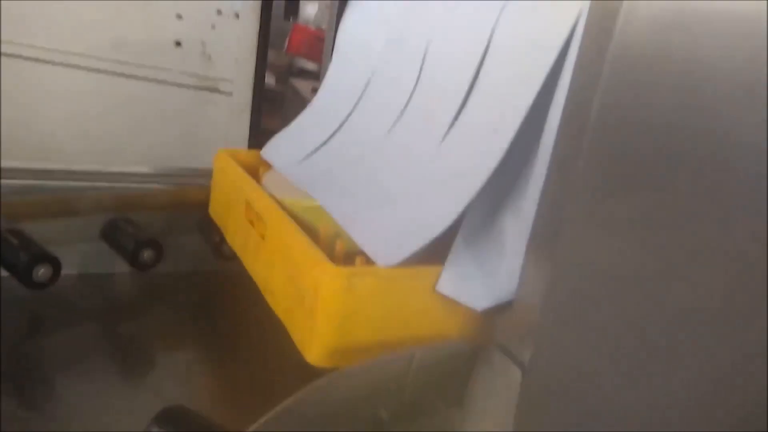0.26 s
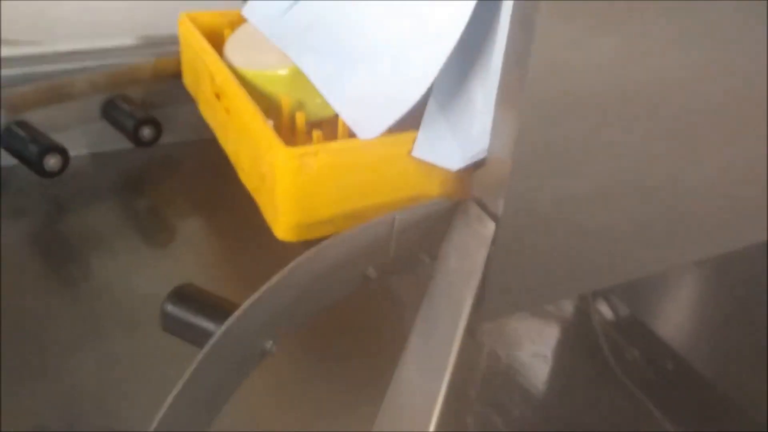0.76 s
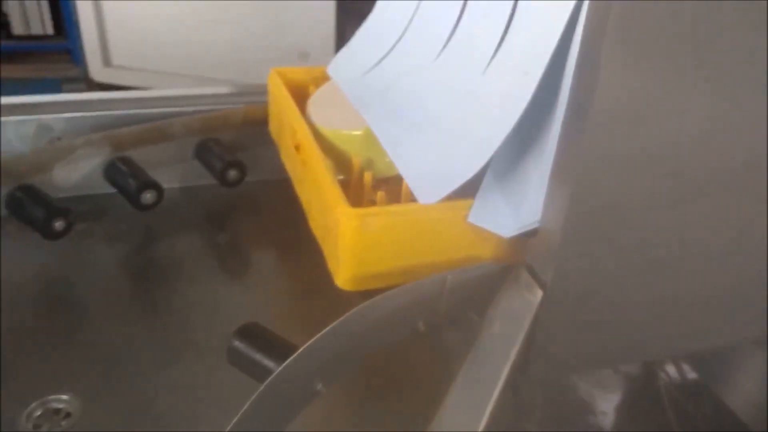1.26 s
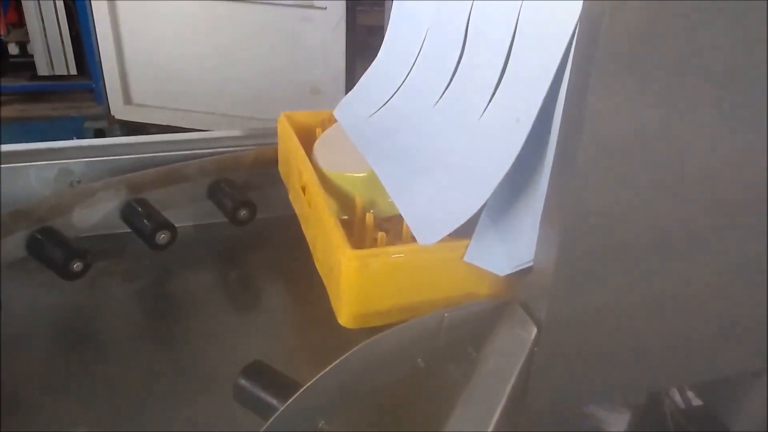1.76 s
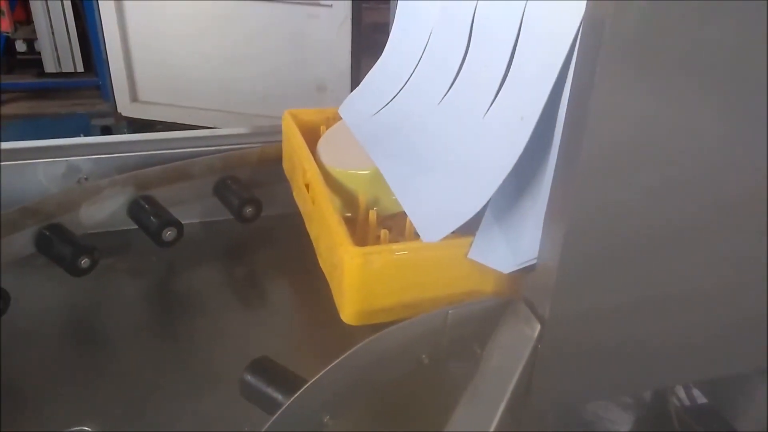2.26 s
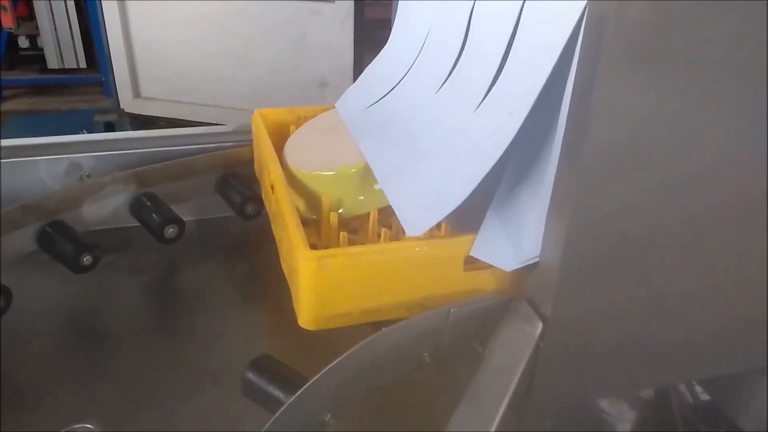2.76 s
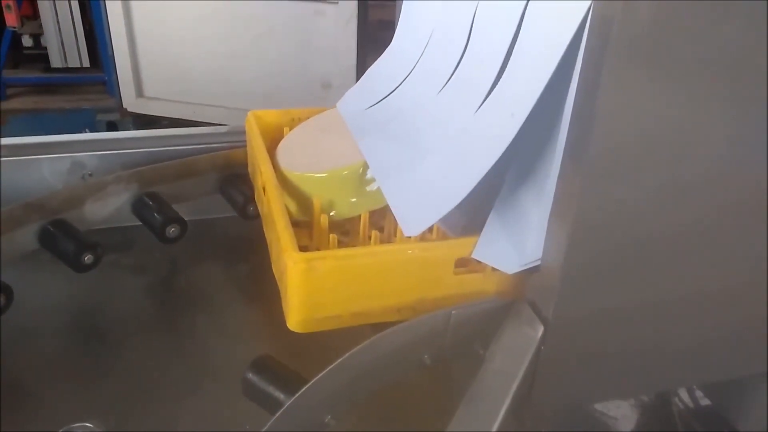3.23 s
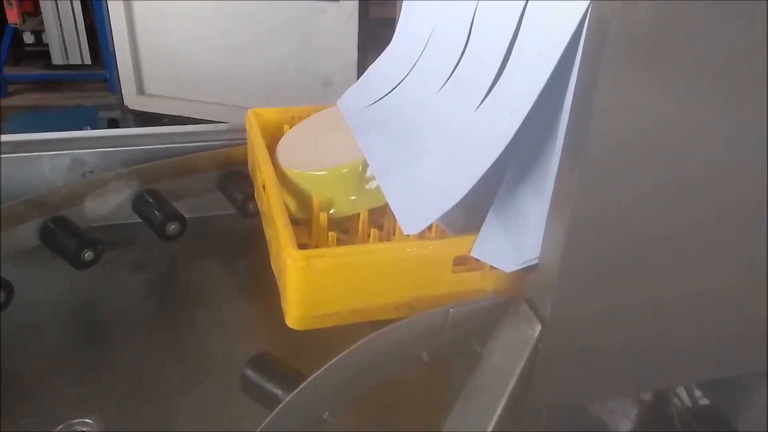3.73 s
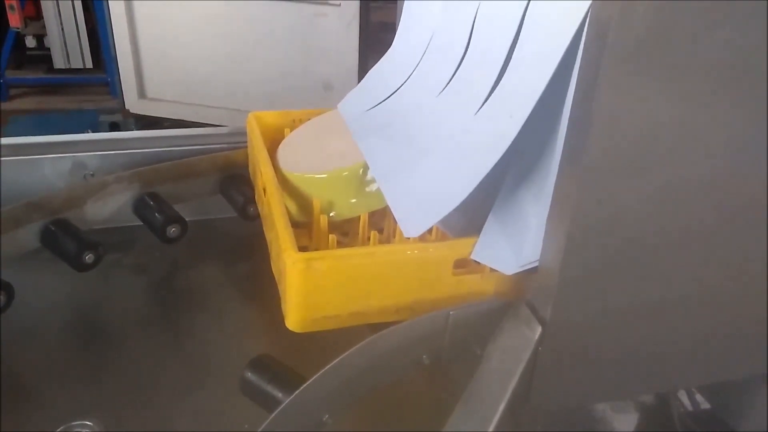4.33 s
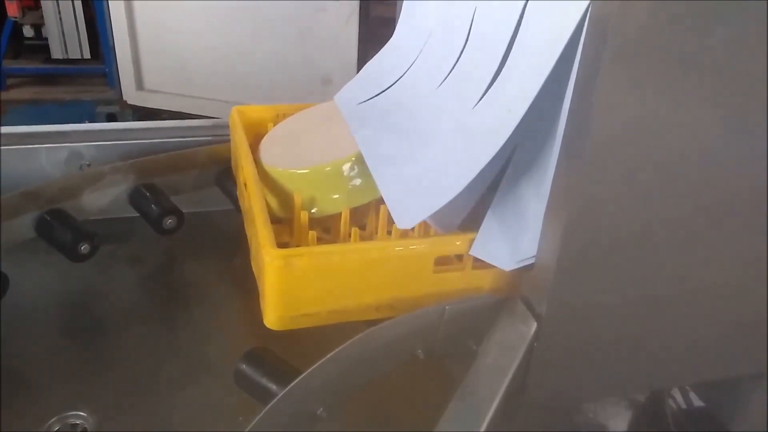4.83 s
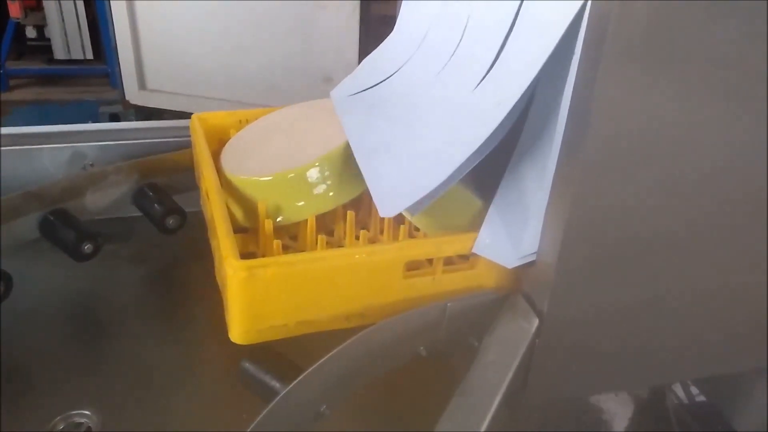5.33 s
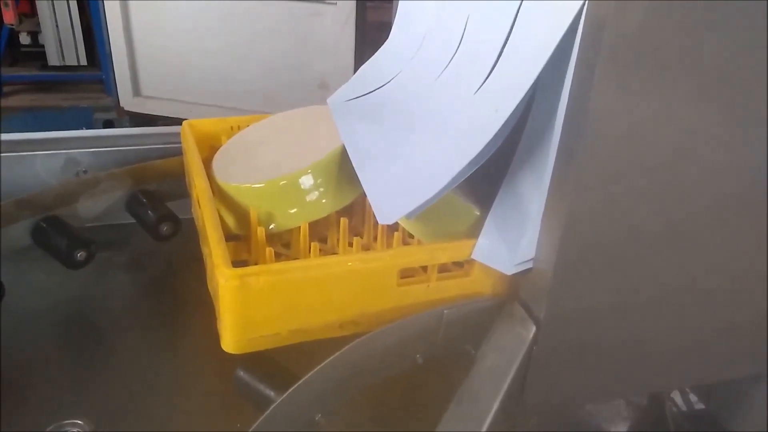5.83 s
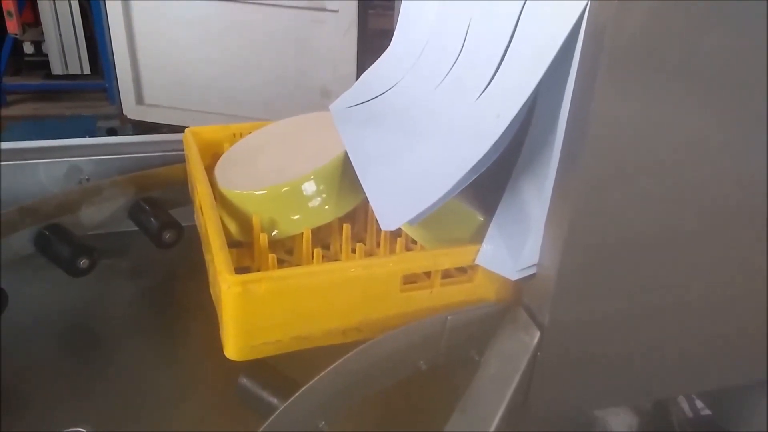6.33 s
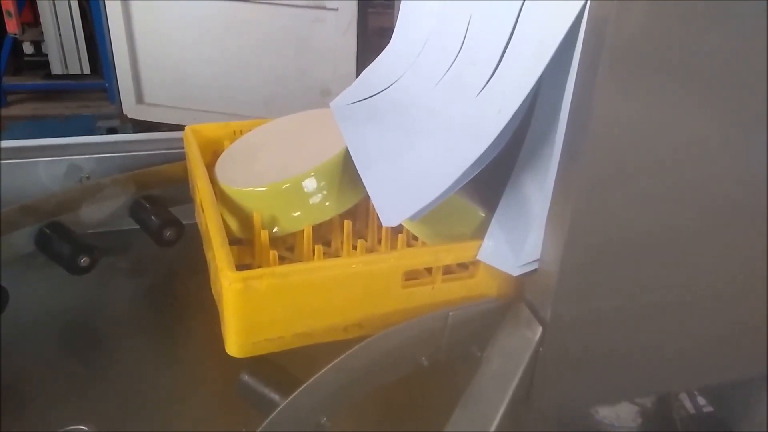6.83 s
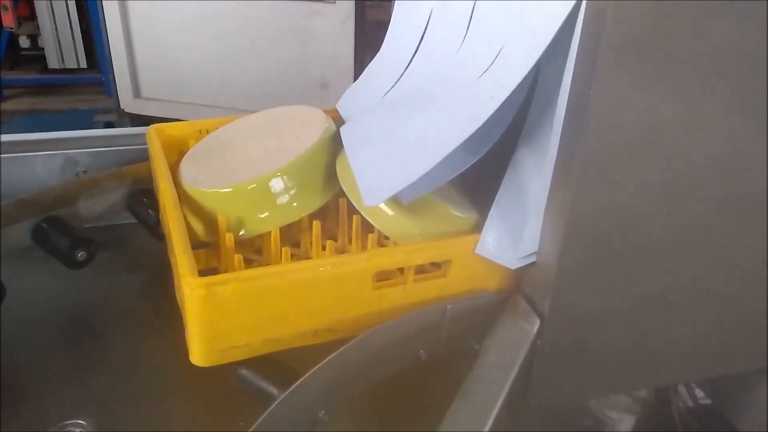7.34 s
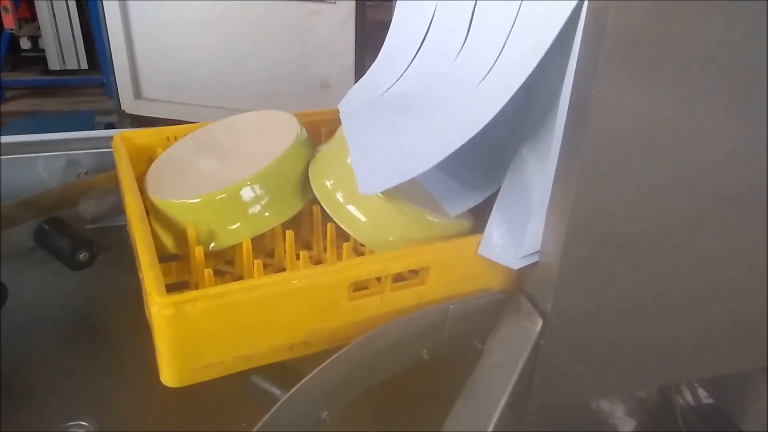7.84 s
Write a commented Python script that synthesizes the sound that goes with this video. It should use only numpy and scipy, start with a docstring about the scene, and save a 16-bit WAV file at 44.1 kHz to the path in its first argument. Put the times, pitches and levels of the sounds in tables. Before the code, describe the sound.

A commercial dishwasher's muffled pumps and hissing spray run throughout, heard close on a phone in stereo with thin bass; noise reduction holds the roar down between blows and lets it surge with them. At 0 s a bowl is knocked, immediately followed by a loud plastic clack. Small chinks and thuds lead to sharp clacks around 0.9 and 1.2 s. At 1.9 s steel pawls clatter hard on a bar, with a heavy low thud at 2.1 and a lighter metallic drop at 2.4. Strong plastic clacks return at 3.2 and 3.6 s, then a steel rattle at 4.2-4.4 and a drop at 4.8. From 4.5 s faint, mid-high crockery chinks scatter, clearer around 5.7 s. Metal clatters again at 6.3 and 6.7 s. Near 7.5 s a low thud meets several bowl chinks; soft knocks and roar continue to about 8 s. Every blow is short, with a clipped kitchen echo.

```python
"""Beside a tunnel dishwasher, a phone with two close microphones hears a plastic dish rack ratcheted out.
Pumps and spray, shaped noise, roar throughout; the phone's noise reduction lets more through with each blow.
A bowl is knocked at once; the rack clacks on rollers and rails, crockery chinks, low thuds come from the steel
table. Near 2 s the steel drive pawls first clatter on their bar, then drop back; from 4.5 s come faint chinks.
Blows are sums of decaying modes, cut short."""
import sys
import numpy as np
from scipy import signal
from scipy.fft import rfft, irfft, next_fast_len
from scipy.io import wavfile
from scipy.ndimage import uniform_filter1d, map_coordinates

SR = 44100
rng = np.random.default_rng(int(sys.argv[2]) if len(sys.argv) > 2 else 0)


def materialize(psi):
    """Save the field psi as 16-bit PCM at rate SR to the path in sys.argv[1].

    A 1-D psi becomes a single channel; in a 2-D psi each row is a channel.
    """
    bounded = np.clip(np.atleast_2d(psi).T, -1, 1)
    quanta = np.round(bounded * 32767).astype(np.int16)
    wavfile.write(sys.argv[1], SR, quanta)


def boost_factor(decibels):
    """Convert a level in decibels to a linear amplitude factor."""
    exponent = np.asarray(decibels, float) / 20
    return 10 ** exponent


N = 356857  # length of the scene, samples
SPAN = SR // 6  # longest a blow may last, samples


def unit(x):
    """Scaled to rms 1."""
    return x / np.sqrt(np.mean(x ** 2) + 1e-20)


def along(f, v, hz):
    """Values v given at f, read at hz on a log frequency axis."""
    return np.interp(np.log(hz + 1), np.log(np.asarray(f) + 1), v)


def filtered(x, response):
    """x times a complex response of frequency."""
    m = next_fast_len(N + SR // 4)
    return irfft(rfft(x, m) * response(np.fft.rfftfreq(m, 1 / SR)), m)[..., :N]


def wobble(rate, size=N):
    """A smooth random curve, rate knots a second."""
    knots = rng.standard_normal(int(size * rate / SR) + 4)
    return map_coordinates(knots, [np.arange(size) * rate / SR])


def rush(spectrum, patchy_db):
    """Two unrelated noises of rms 1 that share patches of random gain."""
    z = signal.stft(rng.standard_normal((2, N)), nperseg=512)[2]
    field = uniform_filter1d(rng.standard_normal(z.shape[1:]), 4, 0)
    field = uniform_filter1d(field, 4, 1)
    pair = signal.istft(z * boost_factor(patchy_db * unit(field)), nperseg=512)[1][:, :N]
    return unit(filtered(pair, lambda hz: boost_factor(along(*np.transpose(spectrum), hz))))


# Calm roar between blows, before wavering: (time [s], level [dB])
CALM_ROAR = [(0, -48.5), (.2, -48.5), (.5, -55), (.75, -53.5), (1.049, -60.5), (1.499, -57.5), (1.9, -58),
             (2.3, -55.5), (2.6, -54.5), (3.1, -58), (3.35, -57.5), (3.75, -61.5), (3.85, -56), (4.5, -57),
             (5.4, -55.5), (6.15, -57), (6.27, -60.5), (6.5, -54), (7.15, -56.5), (7.23, -61), (7.3, -53),
             (8.09, -56.5)]
# Spectra of the muffled pumps, the spray and the far hiss: (frequency [Hz], relative density [dB per Hz])
PUMP_SPECTRUM = [(30, -27.5), (60, -16), (100, 0.5), (160, -6.5), (300, -2), (600, -4.5), (1000, -10),
                 (1500, -14), (2200, -12.5), (4000, -41)]
SPRAY_SPECTRUM = [(900, -38), (1800, -3), (3200, 3), (5000, -1.5), (8000, -8.5), (12000, -18),
                  (15500, -21.5)]
HISS_SPECTRUM = [(200, -13), (1500, -0.5), (6000, -5), (12000, -1.5), (15500, -10.5)]


def roar(blows):
    """Pumps and spray waver over a far hiss; noise reduction lets them through while a blow rings
    and holds them down beside a loud one."""
    open_db, open_from_db, open_slope = -46.5, -42.5, 0.53  # fully open, blow that opens it, dB per dB below
    hush_db, hush_s = 1.5, 0.089  # the holding down just before and after a loud blow, and its span
    spray_db, spray_follows = -9.5, 0.85  # spray against pumps, share of the pumps' swings
    spray_lift = 0.5  # further spray, dB per dB of a very loud blow

    s, low_db = np.transpose(CALM_ROAR)
    low_db = np.interp(np.arange(N) / SR, s, low_db)
    blow_power = uniform_filter1d(np.mean(blows ** 2, axis=0), size=420)
    blow_db = 10 * np.log10(abs(blow_power) + 1e-12)
    over_db = blow_db - open_from_db
    opened_db = open_db + np.minimum(open_slope * over_db, 0)
    loud = np.clip((opened_db - open_db + 6.5) / 4, 0, 1)
    near = uniform_filter1d(loud, round(hush_s * SR))
    calm_db = low_db - hush_db * np.minimum(3 * near, 1) + 1.02 * wobble(15) + 2.32 * wobble(36)
    pumps_db = np.maximum(calm_db, opened_db)
    flutter_db = 1.3 * wobble(24) + 1.7 * wobble(70)
    spray_level_db = low_db + spray_db + spray_follows * (pumps_db - low_db)
    spray_level_db += spray_lift * np.maximum(over_db, 0) + 0.78 * wobble(25)
    pumps = boost_factor(pumps_db) * rush(PUMP_SPECTRUM, patchy_db=1.26)
    spray = boost_factor(spray_level_db) * rush(SPRAY_SPECTRUM, patchy_db=0.2)
    hiss = boost_factor(-73.5) * rush(HISS_SPECTRUM, patchy_db=0.5)
    return boost_factor(flutter_db) * (pumps + spray) + hiss


def ring(hz, db, t60, attack, scatter_db, rough_hz, dense_db, dense_t60):
    """Two takes of decaying modes, as heard along two paths; between them noise stands for countless weak modes."""
    t = np.arange(SPAN) / SR
    level = db + scatter_db * rng.standard_normal(len(hz))
    # loose contact blurs every line: its phase walks at random, in steps of 15 samples
    walk = np.cumsum(rng.standard_normal((2, len(hz), SPAN // 15)), axis=2).repeat(15, axis=2)
    walk = uniform_filter1d(walk, size=30, axis=2)
    step = np.sqrt(2 * np.pi * abs(rough_hz) * 15 / SR)
    phase = rng.uniform(0, 2 * np.pi, (2, len(hz), 1)) + step * walk
    decay = boost_factor(level[:, None] - 60 * t / t60[:, None])
    modes = decay * np.sin(2 * np.pi * hz[:, None] * t + phase)

    bins = np.fft.rfftfreq(SPAN, 1 / SR)
    outline = np.interp(bins, [hz[0] * .8, *hz, hz[-1] * 1.15], [-120, *db, -120])
    outline -= .5e-3 * bins  # the weak modes thin out upwards
    outline[round(10300 * SPAN / SR):] -= 9  # and sink further behind the strong ones at the top
    dense = irfft(rfft(rng.standard_normal((2, SPAN))) * boost_factor(outline), SPAN)
    dense = boost_factor(dense_db - 60 * t / dense_t60) * dense
    return (modes.sum(1) + dense) * (1 - np.exp(-t / attack)) ** 2


# Kitchen echo: (frequency [Hz], t60 [s])
KITCHEN = [(1000, 0.67), (3000, 0.3), (6000, 0.27), (12000, 0.076)]


def add(out, s, blow, wet_db, sink_db, most, fade):
    """One blow with a fresh kitchen echo; the tail fades quickly, sooner the less the blow tops sink_db."""
    hz, t, z = signal.stft(rng.standard_normal((2, SPAN)), SR, nperseg=256)
    t60 = along(*np.transpose(KITCHEN), hz)[:, None]
    tail = signal.istft(z * boost_factor(-60 * t / t60), SR, nperseg=256)[1]
    echo = signal.fftconvolve(blow, tail / np.linalg.norm(tail[0]), axes=1)[:, :SPAN]
    over_db = 20 * np.log10(abs(blow).max()) - sink_db
    hold = np.clip(0.0021 * over_db, .01, most)  # seconds
    closing = 1 / (1 + np.exp((np.arange(SPAN) / SR - hold) / fade))
    out[:, round(s * SR):][:, :SPAN] += (blow + boost_factor(wet_db) * echo) * closing


def notes(rows, spread, t60, attack, gain_db, rough_hz, hold):
    """Soft single notes, each a close pair of modes; rows are (time [s], level [dB], frequency [Hz])."""
    out = np.zeros((2, N + SR))
    for s, db, hz in rows:
        pair = hz * np.array([1 - spread, 1 + spread])
        pair_db = db + gain_db - np.array([0, 7])
        blow = ring(pair, pair_db, np.full(2, t60), attack, scatter_db=2.4, rough_hz=rough_hz,
                    dense_db=-4.0, dense_t60=t60)
        add(out, s, blow, wet_db=-14, sink_db=-76, most=hold, fade=0.036)
    return out[:, :N]


def chink(rows):
    """Struck crockery: a narrow pair of modes with a soft onset."""
    return notes(rows, spread=0.0051, t60=0.14, attack=0.0033, gain_db=6.5, rough_hz=18, hold=0.062)


# Notes of the bowl: (frequency [Hz], level before the crockery gain [dB])
BOWL_NOTES = [(595, -36), (900, -37), (1900, -39.5), (2955, -36), (4150, -35), (6300, -43), (8600, -43.5)]


def bowl():
    """A bowl is knocked once, sounding all its notes together."""
    return chink([(0.0066, db, hz) for hz, db in BOWL_NOTES])


# Hard plastic on rollers and rails: (time [s], level of the modes at 2.2-3.3 kHz before gain [dB],
# then against it: modes below 2.2 kHz [dB], from 3.3 kHz to the edge [dB], above the edge [dB]; edge [Hz])
RACK_CLACKS = [(0.0557, -20.5, -18.5, -2, 2.5, 4100), (0.3881, -51.5, -13, 7, 21, 4100),
               (0.858, -41, -19, 4, 0.5, 4100), (0.8862, -27, -26, -0.5, -13.5, 4100),
               (1.1836, -20, -15.5, -6.5, -42, 3700), (1.209, -26, -20, -6, -27, 3700),
               (1.22, -38.5, -1.5, 1, -25, 3700), (1.539, -42.5, -22, -15, -18, 4100),
               (3.2099, -21.5, -33, 1, -5.5, 4500), (3.429, -38, -13.5, -22, -15, 4100),
               (3.459, -42.5, -16, -9, -12, 4100), (3.6194, -18, -17.5, -6.5, -38, 4500),
               (3.6387, -33, -24, -19, -34, 4500)]
# Modes of the rack: (frequency [Hz], relative level [dB], t60 [s])
RACK_MODES = [(1674, 6.5, 0.11), (1900, 10, 0.082), (2437, 2.5, 0.11), (2673, -9, 0.071),
              (2930, 2.5, 0.052), (3490, 3, 0.03), (3930, 4.5, 0.043), (4125, 4, 0.01), (4815, 9, 0.017),
              (4900, 1, 0.026), (5250, 5, 0.033), (5700, -9.5, 0.048), (6120, -7.5, 0.023),
              (7480, -10, 0.021), (7880, -46, 0.022)]


def clacks():
    """Hard plastic on rollers: a crack and short modes, their groups balanced anew each time."""
    crack_db, crack_from_db, crack_grows = 5, -32, 0.62  # crack against modes; harder clacks crack more, dB per dB
    snap_db, snap_t60_s = 5, 0.024  # the first contact stands out of the ring
    out, (hz, db, t60) = np.zeros((2, N + SR)), np.transpose(RACK_MODES)
    snap = 1 + boost_factor(snap_db - 60 * np.arange(SPAN) / SR / snap_t60_s)
    for s, level_db, low, middle, high, edge in RACK_CLACKS:
        dense_db = crack_db + crack_grows * max(level_db - crack_from_db, 0)
        shade = np.array([low, 0, middle, high])[np.searchsorted([2200, 3300, edge], hz)]
        blow = ring(hz, db + shade + level_db - 10.5, t60, attack=0.0005, scatter_db=1.65,
                    rough_hz=25.1, dense_db=dense_db, dense_t60=0.059)
        add(out, s, blow * snap, wet_db=-6.5, sink_db=-45, most=0.069, fade=0.02)
    return out[:, :N]


# The clearest crockery chinks: (time [s], level before the crockery gain [dB], frequency [Hz])
CLEAR_CHINKS = [(.17, -51, 4900), (.40, -50, 3300), (1.62, -49.5, 1636), (2.134, -51, 1760),
                (2.69, -60, 8600), (3.858, -59, 8400), (4.019, -51, 1540), (4.063, -45, 1106),
                (4.555, -57, 3360), (5.22, -45, 1724), (5.385, -47.5, 1930), (5.425, -47.5, 1900),
                (5.666, -42, 1795), (5.672, -45, 3204), (5.71, -47, 1804), (5.75, -48, 1750),
                (5.83, -59, 1740), (5.99, -53, 1850), (6.163, -49.5, 1790), (6.315, -47, 1780),
                (6.381, -52, 1730), (6.669, -53, 1790), (6.79, -43, 1810), (6.942, -53, 1753),
                (7.271, -52.5, 5400), (7.33, -53, 3220), (7.334, -54, 1810), (7.495, -45.5, 1800),
                (7.53, -52, 5150), (7.538, -42.5, 1740), (7.56, -48, 946), (7.609, -48, 1784),
                (7.706, -52.5, 928), (7.913, -54, 3230), (7.989, -46.5, 1650)]


def chinks():
    """Crockery knocks in the rack, each heard as one ringing note."""
    return chink(CLEAR_CHINKS)


# Low thuds and brief low swells of the roar: (time [s], level before gain [dB], frequency [Hz])
LOW_THUDS = [(0.229, -40.5, 280), (0.333, -40.5, 281), (0.409, -38.5, 122), (0.555, -44, 410),
             (0.693, -38, 537), (0.729, -37, 106), (0.806, -56, 596), (1.076, -43, 510), (1.312, -47, 513),
             (1.544, -41, 345), (2.122, -23.5, 105.6), (2.169, -31, 112), (2.39, -38, 322),
             (2.544, -45, 293), (2.776, -34, 122), (2.829, -53, 613), (2.99, -48, 299), (4.149, -39, 310),
             (4.255, -37, 402), (4.309, -37, 380), (4.621, -41, 415), (4.644, -35, 117), (5.352, -44, 219),
             (5.664, -49, 125.6), (5.998, -38, 109), (6.094, -41, 310), (6.532, -37, 109),
             (7.496, -32.5, 304), (7.519, -24, 108), (8.004, -45.5, 595)]


def low_thuds():
    """Thuds of the steel table and brief low swells, in wide pairs of modes; thin sheet gives no deep bass."""
    thuds = notes(LOW_THUDS, spread=0.038, t60=0.16, attack=0.0031, gain_db=1, rough_hz=7.6, hold=0.026)
    return filtered(thuds, lambda hz: (1j * hz / (45 + 1j * hz)) ** 2)


def contacts(rows, steel, groups, gain_db, lift_db, chatter_db, rough_hz, dense_db):
    """Each contact rings the steel, brighter or duller by where it lands; loose parts chatter on the ring."""
    out, (hz, db, t60) = np.zeros((2, N + SR)), np.transpose(steel)
    lift = lift_db * np.log2(hz / 3000)  # dB per octave
    for s, level_db, *colour in rows:
        shade = np.array([0, *colour])[np.searchsorted(groups, hz)]
        chatter = boost_factor(chatter_db * wobble(350, SPAN))
        modes = ring(hz, db + shade + level_db + gain_db + lift, np.minimum(t60, .3) * 0.65,
                     attack=0.0032, scatter_db=1.0, rough_hz=rough_hz, dense_db=dense_db, dense_t60=0.15)
        add(out, s, modes * chatter, wet_db=-6.5, sink_db=-40.5, most=0.08, fade=0.027)
    return out[:, :N]


# Pawl contacts on the push: (time [s], level of the modes below 3.4 kHz before gain [dB],
# then against it: modes at 3.4-3.95 kHz [dB], 3.95-7 kHz [dB], over 7 kHz [dB])
PUSH_CONTACTS = [(1.9074, -15.5, -3, -8.5, -17.5), (1.926, -16.5, -6, -6.5, -12.5),
                 (1.9373, -23.5, 6, -2.5, -19), (1.947, -33, -7, 3, -11), (1.9716, -30, 0, -13, -9),
                 (1.9894, -32, 0, -10, -25), (4.234, -25, 0.5, 0.5, -12), (4.2609, -29, 2, 0.5, -9),
                 (4.303, -16.5, -5.5, -10, -14.5), (4.334, -28.5, 0.5, -14, -5.5),
                 (4.355, -23, -6, -23, -24.5), (6.313, -27, -2, -7, -17.5), (6.3248, -25.5, -6, -13, -13),
                 (6.344, -25, -7.5, -14.5, -17), (6.3739, -39, -12, -21, -12),
                 (6.737, -17.5, -7, -15.5, -17), (6.755, -21.5, -7, -11.5, -11.5),
                 (6.793, -27, -12.5, -15, -13.5)]
# Modes of pawls and bar: (frequency [Hz], relative level [dB], t60 before capping and shortening [s])
PAWL_AND_BAR = [(2711, -5.5, 0.11), (2734, -12, 0.54), (2700, -20.5, 0.21), (2970, -3.5, 0.37),
                (3100, -13.5, 0.35), (3120, -12.5, 0.09), (3652, -9, 0.2), (3700, -4.5, 0.24),
                (3764, -4, 0.22), (3910, -45.5, 5.0), (4060, -11.5, 0.2), (4550, -4, 0.21),
                (5300, -15.5, 0.22), (5070, -16, 0.24), (5480, -9, 0.15), (5730, -10, 0.089),
                (6090, -8.5, 0.086), (5940, -29.5, 5.0), (6820, -12.5, 0.12), (7348, -15, 0.14),
                (8140, -8.5, 0.25), (8970, -7, 0.16), (9830, -15, 0.65), (9250, -23, 0.36),
                (11750, -25.5, 0.16), (12460, -24, 0.13), (13900, -20, 0.17)]


def pawl_push():
    """Steel drive pawls clatter on their bar as they push."""
    return contacts(PUSH_CONTACTS, PAWL_AND_BAR, [3400, 3950, 7000], gain_db=1.0, lift_db=4,
                    chatter_db=2.0, rough_hz=23, dense_db=9.0)


# Pawls dropping back on the return: (time [s], level of the modes below 3.4 kHz before gain [dB],
# then against it: modes at 3.4-4.8 kHz [dB], 4.8-7 kHz [dB], over 7 kHz [dB])
RETURN_DROPS = [(2.3915, -25.5, 2.5, -17, -17.5), (2.4006, -32, -12, -24, -29),
                (2.4154, -35.5, -16.5, -28, -29.5), (4.7794, -24.5, -17, -9.5, -31),
                (4.787, -24.5, -11, -10, -20), (4.8104, -30.5, -24, -20, -36), (5.676, -44, -16, -7, 4.5),
                (6.4434, -46.5, -6.5, -6, -0.5)]
# Modes of the unloaded pawls: (frequency [Hz], relative level [dB], t60 before shortening [s])
LOOSE_PAWLS = [(2837, -1, 0.11), (3093, 3, 0.12), (3580, -12, .12), (4140, 0, 0.12), (5170, -0.5, 0.19),
               (5770, 2.5, 0.11), (6993, 5.5, 0.123), (7700, -2, 0.091), (8400, 6.5, 0.065),
               (9200, -0.5, 0.15), (9900, -3, .1), (11800, -1, 0.088), (13800, -15, .1)]


def pawl_drops():
    """Unloaded pawls drop back on the return, ringing modes of their own."""
    return contacts(RETURN_DROPS, LOOSE_PAWLS, [3400, 4800, 7000], gain_db=-1.0, lift_db=-0.7,
                    chatter_db=1.5, rough_hz=24, dense_db=-1.0)


def faint_chinks(count):
    """Late on, faint chinks at random moments, all near one note."""
    from_s, to_s, level_db, note_hz = 4.5, 7.7, -58, 1810  # level before the crockery gain
    when = rng.uniform(from_s, to_s, count)
    size, pitch = rng.standard_normal((2, count))
    return chink(np.transpose([when, level_db + 2.8 * size, note_hz * (1 + .04 * pitch)]))


def scene():
    """Two paths from every source, one for each microphone."""
    crockery = bowl() + chinks() + faint_chinks(count=40)
    thuds = low_thuds()
    hard = clacks() + pawl_push() + pawl_drops()
    # noise reduction opens on the blows, a little less for crockery, a little more for low thuds
    background = roar(hard + boost_factor(-2.5) * crockery + boost_factor(1.0) * thuds)
    return background + hard + crockery + thuds


# The microphone pair: (frequency [Hz], phase by which the left leads [rad], left-right likeness [0-1])
MICROPHONE_PAIR = [(90, 1.9, .7), (300, .2, .55), (1150, 0, .95), (1450, .3, .7), (1750, 1.6, .6),
                   (2080, 3, .96), (2400, 3.3, .96), (2750, 4.8, .4), (3050, 6.5, .75), (3500, 6.4, .92),
                   (3900, 6, .75), (4200, 5, .4), (4600, 3.3, .75), (5150, 5, .3), (5700, 6.9, .75),
                   (6300, 6.3, .45), (6800, 4, .5), (7300, 3.4, .5), (7800, 1.5, .3), (8300, 1.1, .5),
                   (8900, -1.5, .3), (9600, -2.2, .45), (12000, -3.5, .25)]
# Balance of the pair: (frequency [Hz], left over right [dB])
LEFT_TILT = [(90, -1.5), (300, 1.6), (1200, -0.5), (2200, 1.5), (3000, -3.5), (5000, -2.5), (9000, -3.5),
             (13000, -1)]


def microphones(dry):
    """The right hears part of the left's path, phase-shifted by the phone's body, and part of its own."""
    f, lead, alike = np.transpose(MICROPHONE_PAIR)

    def like(hz):
        return np.interp(hz, f, alike)

    def side(hz):
        return boost_factor(along(*np.transpose(LEFT_TILT), hz) / 2)

    dry = filtered(dry, lambda hz: (hz < 15400) * 1j * hz / (50 + 1j * hz))  # thin bass, band limit
    left = filtered(dry[0], side)
    shared = filtered(dry[0], lambda hz: like(hz) * np.exp(-1j * np.interp(hz, f, lead)) / side(hz))
    own = filtered(dry[1], lambda hz: np.sqrt(1 - like(hz) ** 2) / side(hz))
    return np.array([left, shared + own])


def roll_off(x):
    """The treble ends steeply here."""
    return signal.sosfilt(signal.butter(12, 15780, fs=SR, output="sos"), x)


def record(dry):
    """The phone takes the scene down through its two close microphones."""
    mix = microphones(dry)
    return roll_off(mix)


dry = scene()
out = record(dry)
materialize(out)
```